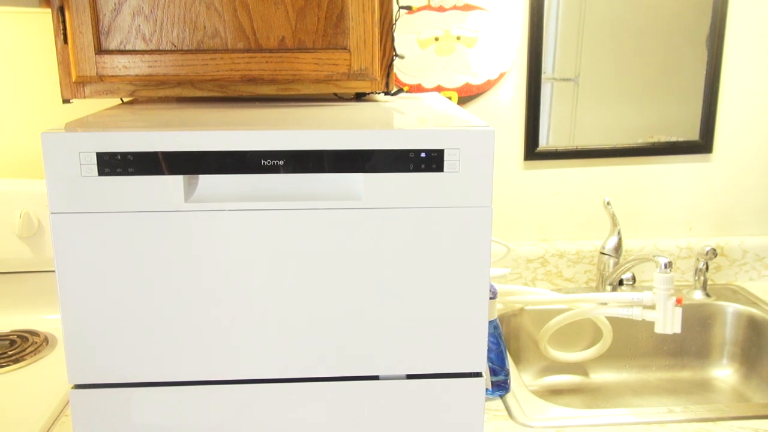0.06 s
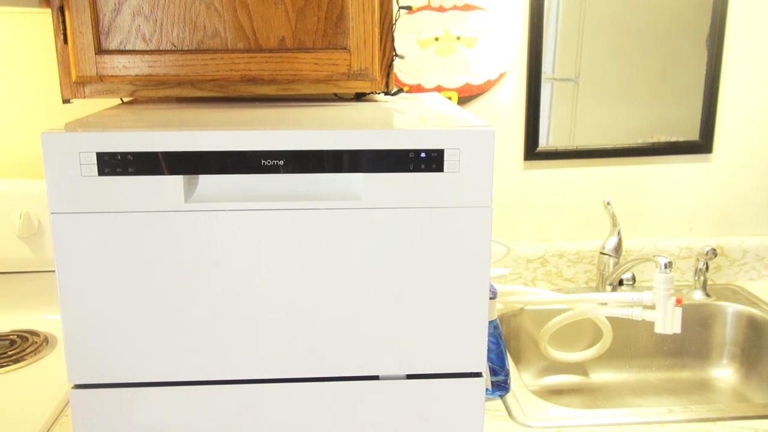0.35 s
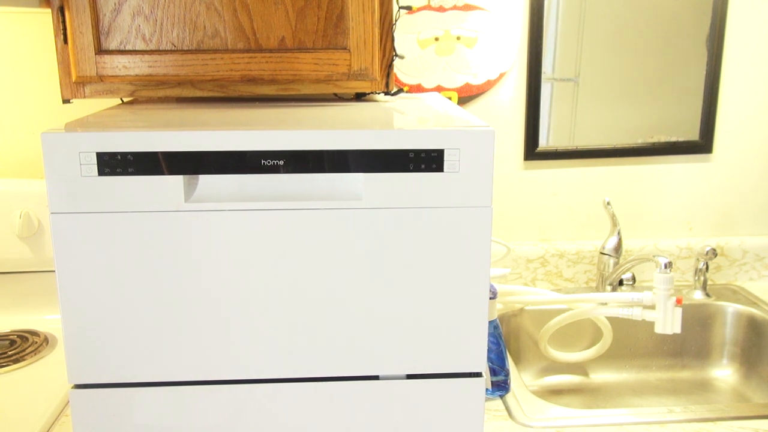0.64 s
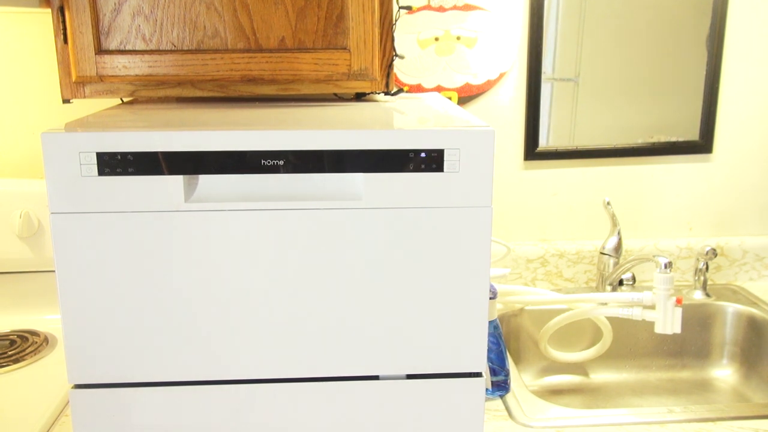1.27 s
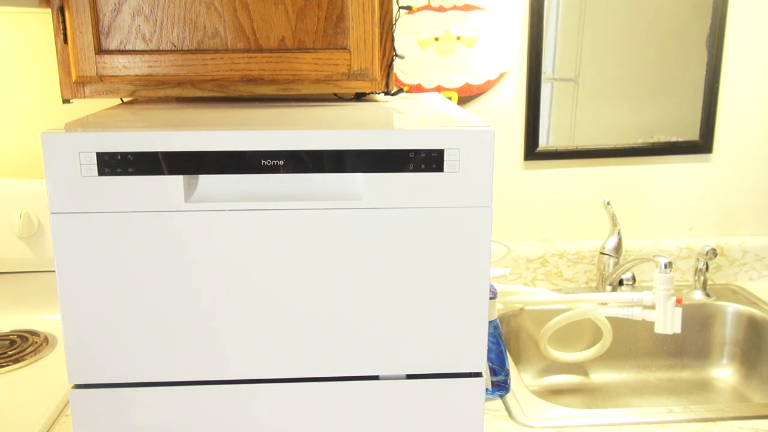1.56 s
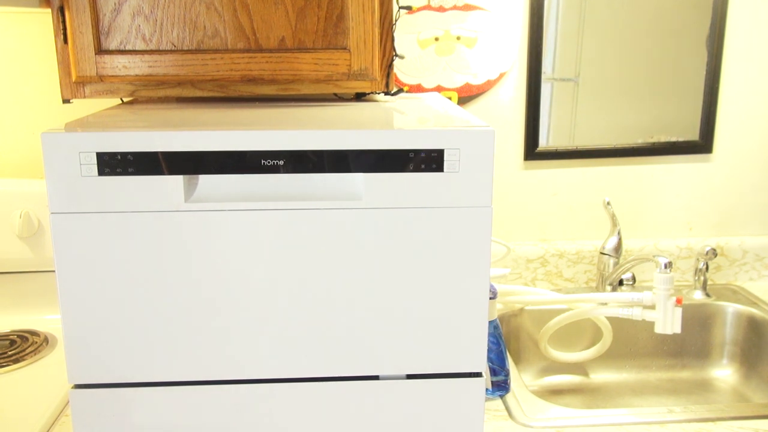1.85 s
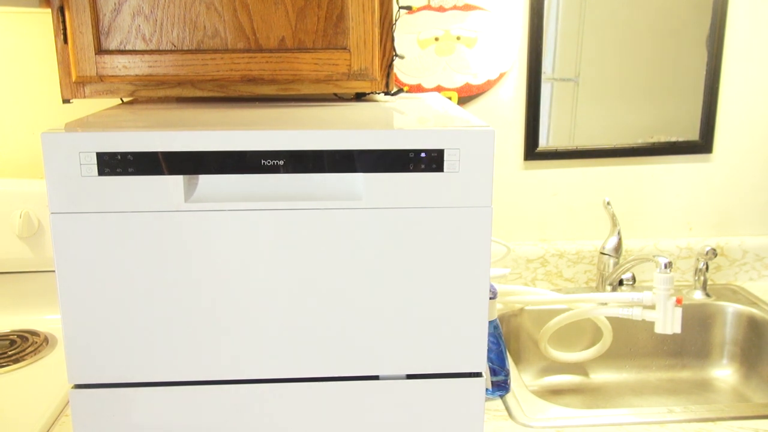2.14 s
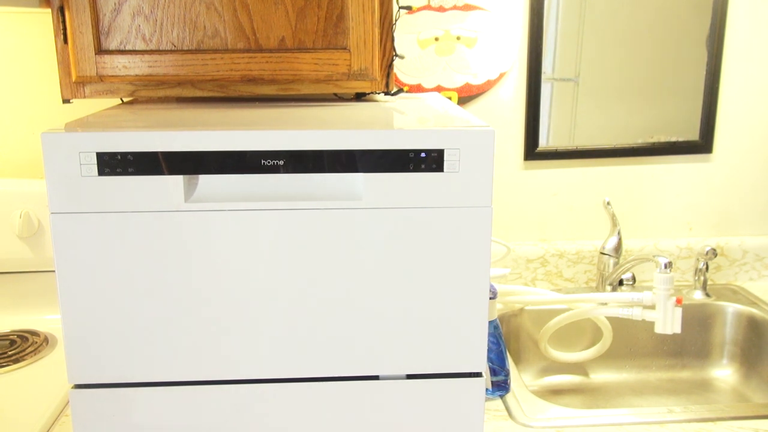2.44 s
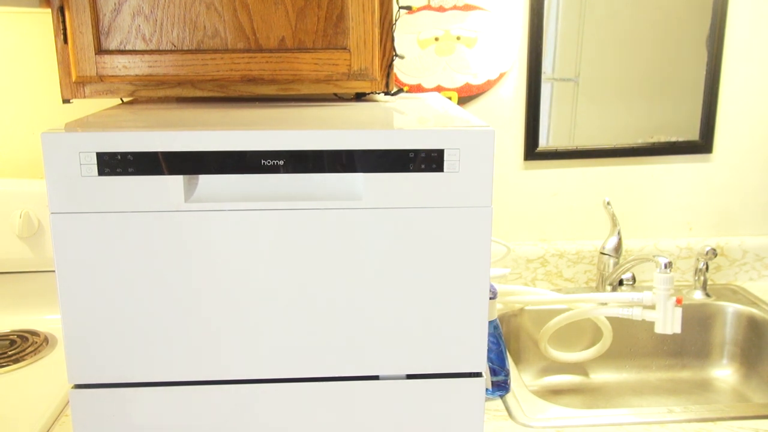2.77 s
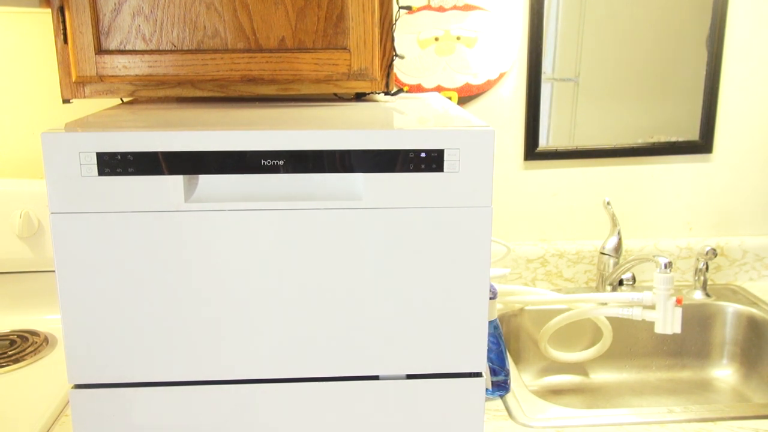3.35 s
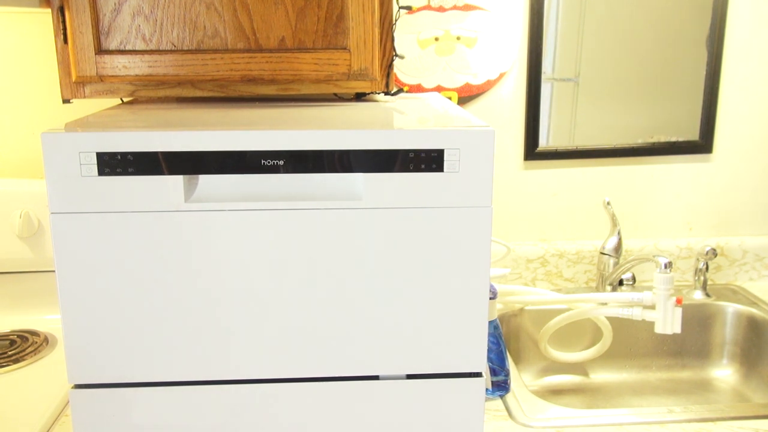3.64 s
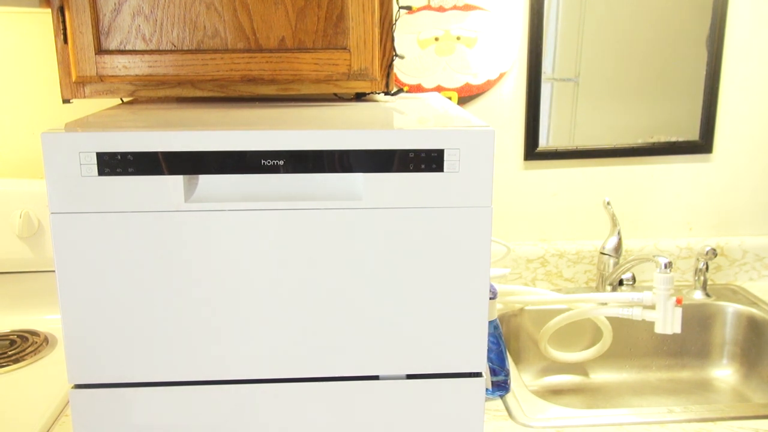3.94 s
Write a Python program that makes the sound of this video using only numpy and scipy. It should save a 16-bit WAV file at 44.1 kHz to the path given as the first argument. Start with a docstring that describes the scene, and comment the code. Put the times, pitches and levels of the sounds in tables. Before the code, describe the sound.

A small dishwasher runs with a steady low hum, buzzing panels and churning water.

```python
"""A countertop dishwasher runs in a small kitchen, heard from close in front.
From the start its pump motor hums on the mains, throbs against slower rotor tones and buzzes the case
panels on and off, while water churns and drips inside. A dull splash and a few light ticks sound early.
A rattle comes and goes, and the hum's overtones harden as the pump takes load.
Near the end a faint high hiss swells twice and water splashes against the tub again."""
import sys
import numpy as np
from scipy import signal
from scipy.fft import rfft, irfft, dct
from scipy.io import wavfile
from scipy.ndimage import uniform_filter1d

SR = 44100
rng = np.random.default_rng(int(sys.argv[2]) if len(sys.argv) > 2 else 0)


def int16_out(signal):
    """Quantize to a 16-bit WAV file."""
    q = np.round(np.clip(np.atleast_2d(signal).T, -1, 1) * 32767)
    wavfile.write(sys.argv[1], SR, q.astype(np.int16))


N = 176400
TIME = np.arange(N) / SR
BIN_HZ = np.arange(N // 2 + 1) * SR / N
MAINS_HZ = 60.02

# motor hum (multiple of the mains, level [dB], change under load [dB])
HUM_TONES = [(1, -52.5, -2), (2, -25, 0), (3, -43, 0.5), (4, -39.5, 0), (5, -50, 3.5), (8, -44.5, -0.5),
             (9, -61, -8), (14, -55.5, -1.5), (15, -61.5, 3), (17, -63.5, 9.5), (18, -63, -6.5),
             (20, -61.5, 0.5), (23, -66, 3), (24, -53.5, 0.5), (25, -67, -2), (26, -64, -7.5),
             (27, -67, 5.5), (29, -67.5, 2.5), (30, -59.5, -8.5), (32, -65, -9), (33, -60.5, 4.5),
             (38, -80, 10.5)]
# buzz of the door panel and of the side panel (time [s], level [dB])
DOOR_BUZZ = [(0.0, -31.5), (0.04, -32), (0.27, -51), (0.81, -49), (0.92, -34), (1.41, -38.5), (1.45, -29.5),
             (1.5, -45), (1.56, -33.5), (2.02, -36), (2.47, -34), (2.5, -45), (2.79, -34), (3.2, -46),
             (3.28, -39), (3.38, -56), (3.45, -36), (3.78, -48), (3.82, -33), (3.98, -35)]
SIDE_BUZZ = [(0.0, -40), (0.25, -38), (0.33, -49.5), (0.59, -34), (0.85, -46.5), (0.95, -36.5), (1.23, -40),
             (2.42, -37.5), (2.48, -44.5), (2.89, -37), (3.05, -51), (3.72, -40.5), (3.76, -55),
             (3.8, -37.5), (3.92, -37), (3.98, -39)]
# rotor tones (pitch [Hz], level halfway through [dB])
ROTOR_TONES = [(67.5, -56.5), (70.5, -61.5), (95.5, -47.5), (108, -50), (110.5, -42.5), (124.5, -52),
               (149, -52)]
# whine of the bearings (pitch [Hz], level at half load [dB])
BEARING_WHINE = [(1125, -60), (2190, -63), (2880, -68), (3330, -67), (3842, -69.5), (4412, -67),
                 (5490, -76), (6020, -74), (6750, -71)]
# the pump's lower and upper ringing notes (time [s], level [dB])
LOW_RING = [(0, -59), (.4, -62), (.5, -52), (.75, -54.5), (.92, -68), (1.3, -59.5), (1.72, -62),
            (1.87, -53), (2.05, -66), (2.75, -59), (3, -67), (3.3, -60), (4, -66)]
HIGH_RING = [(0, -72), (1.4, -69), (2.6, -65), (3.6, -64), (3.72, -59), (3.81, -56), (3.9, -66), (4, -68)]
# rattle tones (multiple of the mains, relative level [dB])
RATTLE_TONES = [(3.5, -12), (5.5, -10), (7.5, 1)]
# swells of the rattle (time [s], level [dB])
RATTLE_LEVEL = [(0, -51), (.68, -51), (.8, -45), (1.03, -41), (1.15, -49), (1.35, -40), (1.5, -43.5),
                (1.9, -43.5), (2.05, -53), (2.6, -53), (2.72, -43), (3.05, -55), (4, -54)]
# thin high buzz (frequency [Hz], typical level of one tone [dB])
FINE_BUZZ = [(2300, -76.5), (3500, -81), (6000, -87), (10000, -104)]
# water behind the door (frequency [Hz], relative level [dB])
WATER_COLOUR = [(20, -10), (45, -10.5), (80, -9), (125, -1), (165, -3.5), (210, 3), (255, -4), (290, 1.5),
                (390, -3), (435, 3.5), (485, 2.5), (540, -3.5), (640, -4), (850, -9), (1200, -13.5),
                (1450, -12), (1800, -15.5), (2020, -16), (2400, -20), (4000, -26), (6800, -29), (8500, -33),
                (11000, -36.5), (13000, -38), (15500, -43.5)]
# swells of the low churning (time [s], relative level [dB])
CHURN_LEVEL = [(0, 4), (.7, -0.5), (1.5, 1), (2.2, -2.5), (2.8, 0.5), (3.3, -3), (4, -1.5)]
# drips, splashes and ticks (start [s], level [dB], centre [Hz], time to fade by 60 dB [s])
DRIPS = [(.47, -50.5, 6560, .17), (.722, -45.5, 3420, .085), (1.338, -41.5, 1405, .34),
         (3.442, -41.5, 860, .12), (3.554, -40.5, 1400, .1)]
SPLASHES = [(0.0, -41.5, 950, .8), (3.521, -36, 980, .14), (3.541, -41, 1250, .14)]
TICKS = [(0.0, -33.3, 4800, 0.3), (.101, -46.5, 7200, .14), (.173, -43.5, 4200, .15),
         (.31, -48.5, 5500, .2), (.431, -38.8, 4900, 0.23), (.65, -46.5, 6200, .13),
         (1.452, -49, 6200, 0.2)]
# colour of a splash and of a tick (multiple of its centre, relative level [dB])
SPLASH_COLOUR = [(.3, -14), (.75, -3), (1, 0), (1.3, -6), (2, -19), (6, -45)]
TICK_COLOUR = [(.1, -8), (.36, -6), (.62, 1), (1.05, .5), (1.4, -3), (2.1, -9.5), (3.2, -18.5)]
# swells of the hiss (time [s], level [dB])
HISS_LEVEL = [(0, -64), (2.48, -69), (2.58, -55), (2.68, -51), (2.76, -67), (2.86, -67), (2.95, -53),
              (3.2, -55), (3.32, -51.5), (3.55, -52), (3.68, -61.5), (4, -60)]
# colour of the hiss (frequency [Hz], relative level [dB])
HISS_COLOUR = [(1000, -17), (3000, 6), (7500, 2), (10000, -0.5), (13500, -7), (15500, -13)]
# stereo width of the noise (frequency [Hz], side minus middle [dB])
WIDTH = [(60, -23), (250, -19), (500, -18), (1300, -15.5), (2300, -19), (3700, -19), (5500, -9), (7500, -8),
         (10300, -8), (11600, -30)]
# stereo balance (frequency [Hz], left minus right [dB])
BALANCE = [(120, -2.4), (380, 1), (700, 0), (1300, 3), (2400, 1.4), (8000, .5)]


def motor():
    """The motor hums at multiples of the mains; load shifts their levels and hardens the sound."""
    hum = np.zeros(N)
    for multiple, db, load_db in HUM_TONES:
        waver_db = 0.94 if multiple < 9 else 1.16
        level = db + load_db * load()
        hum += tone(multiple * MAINS_HZ, level, waver_db, jitter=.045 * np.sqrt(multiple), rate=6.915)
    return hum


def load(start_s=1.35, rise_s=.7):
    """How hard the pump works, rising from 0 to 1."""
    return np.clip((TIME - start_s) / rise_s, 0, 1)


def panels(trim_db=-.3):
    """The motor buzzes two case panels on and off, each at one multiple of the mains."""
    return sum(tone(multiple * MAINS_HZ, curve(level) + trim_db, waver_db=.6, jitter=.046, rate=9)
               for multiple, level in ((7, DOOR_BUZZ), (6, SIDE_BUZZ)))


def pump(rise_db_per_s=2.5, load_db=2.5, low_ring_hz=2011, high_ring_hz=3003):
    """Growing rotor tones throb against the hum, the bearings whine and two notes swell and fade."""
    rise = rise_db_per_s * (TIME - TIME.mean())
    rotor = sum(tone(hz, db + rise, waver_db=1.5, jitter=.89, rate=2.68) for hz, db in ROTOR_TONES)
    whines = [(hz, db + load_db * (load() - .5)) for hz, db in BEARING_WHINE]
    rings = [(low_ring_hz, curve(LOW_RING)), (high_ring_hz, curve(HIGH_RING))]
    return rotor + sum(tone(hz, db, waver_db=1.4, jitter=.5 * hz / low_ring_hz, rate=8)
                       for hz, db in whines + rings)


def rattle():
    """A rattle on every second mains cycle puts tones halfway between those of the hum."""
    return sum(tone(multiple * MAINS_HZ, db + curve(RATTLE_LEVEL), waver_db=1, jitter=.3, rate=7.1)
               for multiple, db in RATTLE_TONES)


def fine_buzz(scatter_db=8):
    """Many faint, high multiples of the mains, each with its own random strength."""
    hz = MAINS_HZ * np.arange(39, 175)
    strength = gain(level_at(FINE_BUZZ, hz) + scatter_db * rng.standard_normal(len(hz)))
    phase = 2 * np.pi * rng.random(len(hz))
    spectrum = np.zeros(len(BIN_HZ), complex)
    spectrum[np.round(hz * N / SR).astype(int)] = strength * np.exp(1j * phase)
    return irfft(spectrum, N) * N / np.sqrt(2)


def water(level_db=-36.5):
    """The lows churn, the middle flickers with the spray, the treble pulses lightly with the motor."""
    spectrum = rfft(noise(WATER_COLOUR))
    low_pass, mid_pass = (1 / (1 + (BIN_HZ / hz) ** 4) for hz in (700, 2300))
    pulse = 1 + .032 * np.sin(2 * np.pi * MAINS_HZ * TIME)
    churn = irfft(spectrum * low_pass, N) * gain(.04 * wander(rate=8.9) + curve(CHURN_LEVEL))
    spray = irfft(spectrum * (mid_pass - low_pass), N) * gain(.76 * wander(rate=49))
    treble = irfft(spectrum * (1 - mid_pass), N) * pulse * gain(wander(rate=22))
    return gain(level_db) * (churn + spray + treble)


def drips():
    """Each drop rings briefly on one slightly unsteady note."""
    return sum(tone(hz, db, waver_db=0, jitter=.00028 * hz, rate=260) * strike(start, fade_s, .006)
               for start, db, hz, fade_s in DRIPS)


def splashes():
    """Water hits the tub in dull bursts of noise."""
    return bursts(SPLASHES, SPLASH_COLOUR)


def ticks():
    """Light ticks: short, bright bursts of noise."""
    return bursts(TICKS, TICK_COLOUR)


def hiss():
    """A faint high hiss that swells twice."""
    return noise(HISS_COLOUR) * gain(curve(HISS_LEVEL))


def tone(hz, db, waver_db, jitter, rate):
    """A sine wave whose level wanders by waver_db and whose phase wanders by jitter radians."""
    phase = 2 * np.pi * (hz * TIME + rng.random()) + jitter * wander(rate)
    return np.sqrt(2) * gain(db + waver_db * wander(rate)) * np.sin(phase)


def noise(colour, centre=1):
    """Coloured stereo noise: a middle part both ears share, plus a side part for width."""
    middle, side = rfft(rng.standard_normal((2, N))) * gain(level_at(colour, BIN_HZ / centre))
    middle = irfft(middle, N)
    side = irfft(side * gain(level_at(WIDTH, BIN_HZ)), N)
    return np.array([middle + side, middle - side]) / middle.std()


def bursts(events, colour):
    """One quickly fading puff of noise for each event."""
    return sum(noise(colour, hz) * gain(db) * strike(start, fade_s, rise_s=.007)
               for start, db, hz, fade_s in events)


def strike(start, fade_s, rise_s):
    """Loudness of a hit: a quick rise, then a fall of 60 dB every fade_s."""
    age = np.maximum(TIME - start, 0)
    return np.minimum(age / rise_s, 1) * np.exp(-np.log(1000) * age / fade_s)


def wander(rate):
    """Smooth random drift with a spread of 1, taking `rate` steps a second."""
    step = max(int(SR / rate), 2)
    points = rng.standard_normal(N // step + 2)
    joined = np.interp(np.arange(N) / step, np.arange(len(points)), points)
    smooth = uniform_filter1d(joined, step // 2 + 1)
    return (smooth - smooth.mean()) / smooth.std()


def curve(table):
    """Join (time, level) points with straight lines."""
    times, levels = np.transpose(table)
    return np.interp(TIME, times, levels)


def level_at(table, hz):
    """Read between (frequency, level) points, with octaves evenly spaced."""
    frequencies, levels = np.transpose(table)
    return np.interp(np.log(np.maximum(hz, 1e-6)), np.log(frequencies), levels)


def gain(db):
    """Turn decibels into a multiplier."""
    return 10 ** (np.asarray(db) / 20)


def scene():
    """All the sounds together, with each frequency leaning a little to one side."""
    machine = motor() + panels() + fine_buzz() + rattle() + pump()
    mix = machine + water() + ticks() + splashes() + drips() + hiss()
    spectrum = dct(mix, norm="ortho")
    lean_db = level_at(BALANCE, np.arange(N) * SR / (2 * N)) / 2
    return dct(spectrum * gain([lean_db, -lean_db]), type=3, norm="ortho")  # back to a waveform


def record(dry):
    """Fade in very quickly and cut away the highest treble."""
    fade_s, top_hz = .0006, 15700
    treble_cut = signal.ellip(10, .1, 80, top_hz, fs=SR, output="sos")
    return signal.sosfilt(treble_cut, dry * np.minimum(TIME / fade_s, 1))


dry = scene()
out = record(dry)
int16_out(out)
```